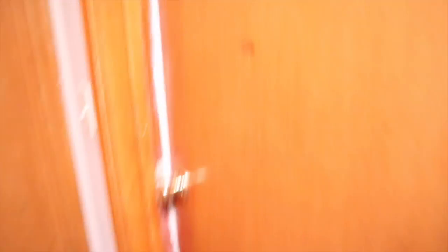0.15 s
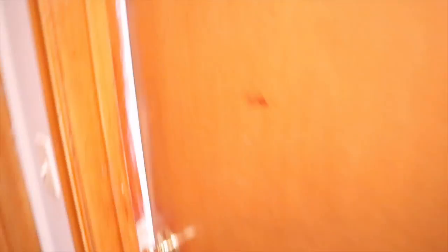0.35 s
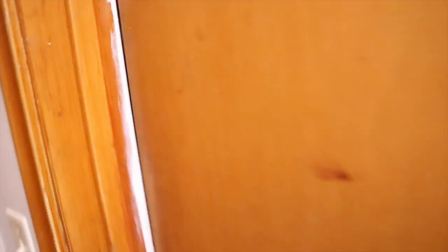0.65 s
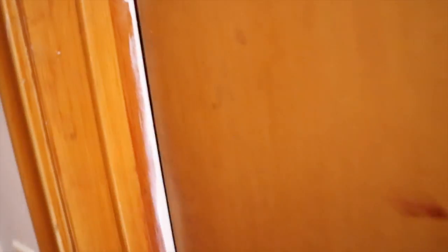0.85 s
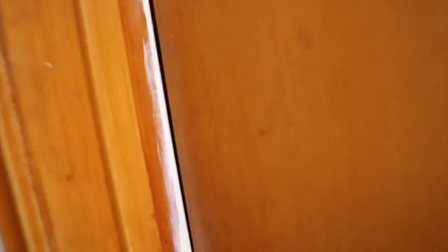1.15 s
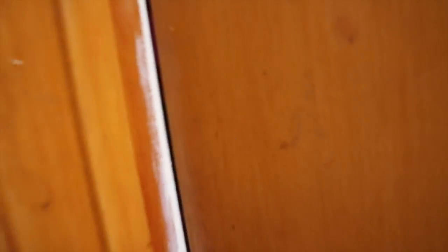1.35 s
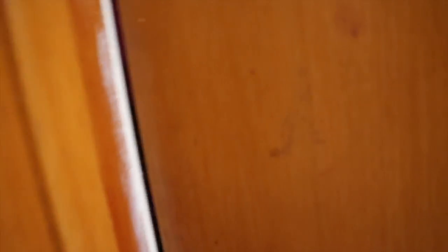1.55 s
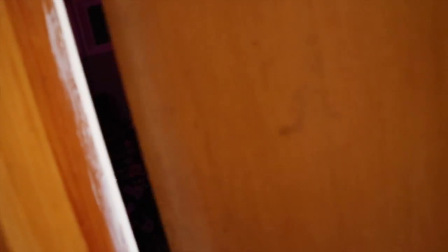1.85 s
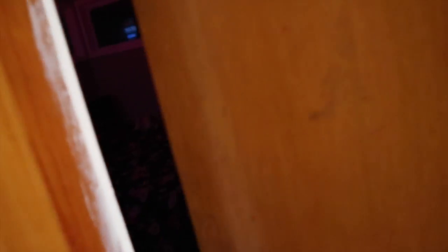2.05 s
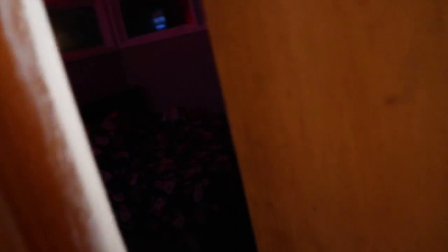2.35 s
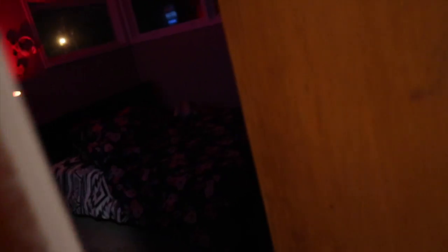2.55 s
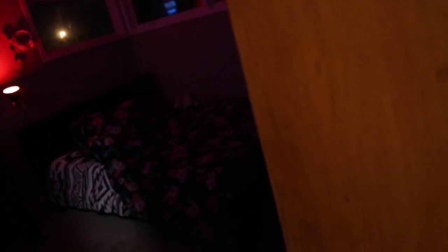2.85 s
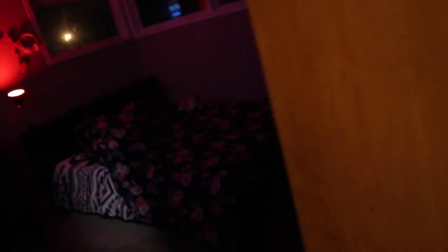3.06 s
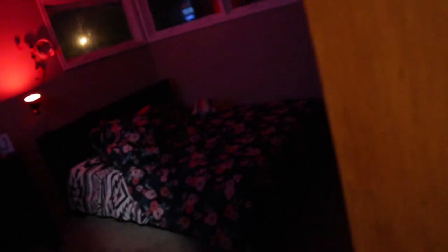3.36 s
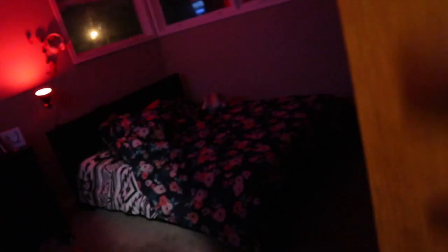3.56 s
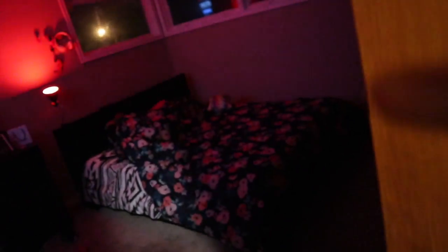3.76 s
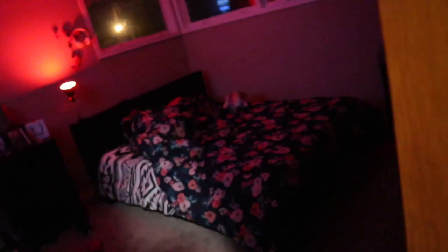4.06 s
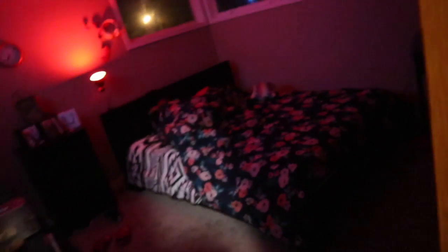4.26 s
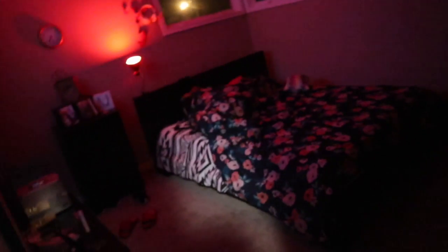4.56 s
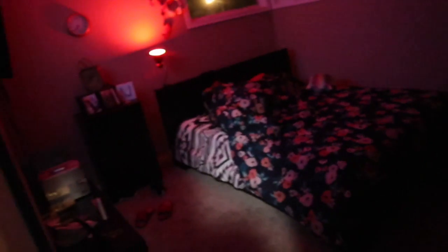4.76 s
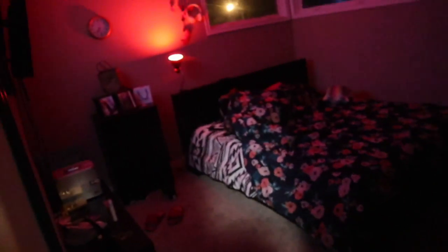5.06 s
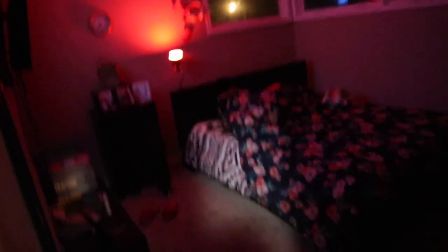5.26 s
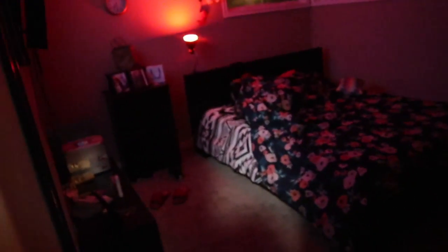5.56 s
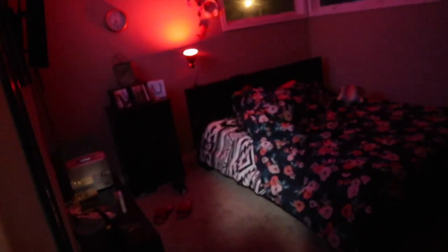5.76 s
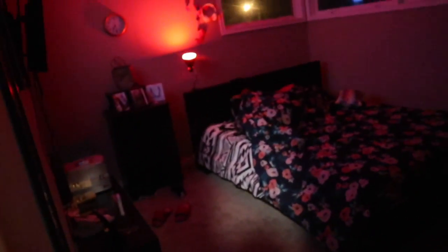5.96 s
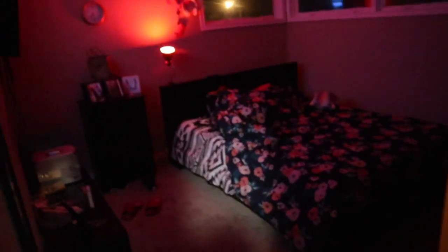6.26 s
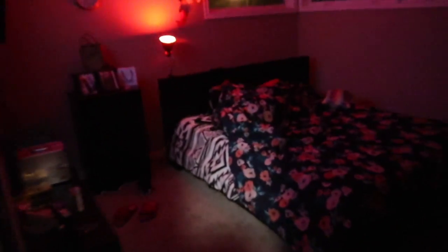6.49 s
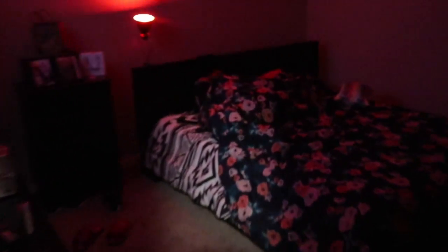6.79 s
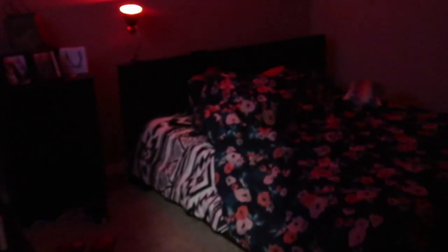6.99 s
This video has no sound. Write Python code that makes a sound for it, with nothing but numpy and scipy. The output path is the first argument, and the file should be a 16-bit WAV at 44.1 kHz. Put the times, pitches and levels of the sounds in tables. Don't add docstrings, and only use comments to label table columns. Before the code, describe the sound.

A low, wavering appliance hum fills a quiet house. Plastic creaks and soft finger rubs come first, then a door latch releases in a hard, rapid wooden-metallic rattle with a short hallway tail. After small knocks, close creaking, ticking and scuffing crowd the small handheld stereo microphones, leaning left, with one very sharp snap, a low bump and a brief skin squeak.

```python
import sys
import numpy as np
from scipy import signal
from scipy.fft import rfft, irfft, next_fast_len
from scipy.io import wavfile
from scipy.ndimage import uniform_filter1d

SR = 44100
rng = np.random.default_rng(int(sys.argv[2]) if len(sys.argv) > 2 else 0)


def to_wav(sig):
    pcm = np.clip(np.atleast_2d(sig), -1, 1) * 32767
    pcm = np.round(pcm).astype(np.int16)
    wavfile.write(sys.argv[1], SR, pcm.T)


def nominal_scale(level):
    x = np.asarray(level, float) / 20
    return 10 ** x


N = 314344

# frequency in Hz, level in dB per Hz.
PANEL_COLOUR = [(60, -26), (120, -10), (280, 1), (400, -4), (520, -6.5), (700, -7.5), (950, 7),
                (1330, -3.5), (1600, -4), (2200, -9.5), (3100, -16.5), (3700, -30.5), (6800, -34),
                (11000, -80)]
# start in seconds, peak in dB.
PRESS_EVENTS = [
    (5.307, -32),
    (5.466, -34),
    (5.489, -27.5),
    (5.51, -27.5),
    (5.531, -25.5),
    (5.5532, -27),
]


def read(points, hz):
    f, value = np.transpose(points)
    return np.interp(np.log(hz + 1), np.log(f + 1), value)


def evened(x):
    return x / np.sqrt(np.mean(x ** 2) + 1e-20)


def add(mix, s, sound):
    part = mix[round(s * SR):][:len(sound)]
    part += sound[:len(part)]


def coloured(points, count=N):
    size = next_fast_len(count)
    spectrum = rfft(rng.standard_normal(size))
    gain = nominal_scale(read(points, np.fft.rfftfreq(size, 1 / SR)))
    return evened(irfft(spectrum * gain, size)[:count])


def patchy(x, patchy_db):
    z = signal.stft(x, SR, nperseg=256, noverlap=192)[2]
    patches = uniform_filter1d(rng.standard_normal(z.shape), 5, 0)
    patches = evened(uniform_filter1d(patches, 24, 1))
    return evened(signal.istft(z * nominal_scale(patchy_db * patches), SR, nperseg=256, noverlap=192)[1][:N])


def ring(modes, count=1500, rise=0.00036):
    t = np.arange(count) / SR
    tones = sum(nominal_scale(db - 60 * t / t60) * np.sin(2 * np.pi * hz * t) for hz, db, t60 in modes)
    return tones * (1 - np.exp(-t / rise))


def ports(x, leaning, table, turn, corner_hz):
    size = next_fast_len(N)
    hz = np.fft.rfftfreq(size, 1 / SR)
    phase = np.exp(1j * turn / (1 + (hz / corner_hz) ** 4))
    side = irfft(rfft(leaning, size) * nominal_scale(read(table, hz)) * phase, size)[:N]
    return np.array([x + side, x - side])


def air():
    # frequency in Hz, level in dB per Hz.
    air_common = [(39, -13), (66, -3), (120, -9), (173, -8), (194, -3.5), (301, -7), (330, -5.5),
                  (405, -6.5), (510, -11), (613, -15.5), (1060, -20.5), (1280, -24), (2730, -30.5),
                  (10800, -47.5), (16000, -67.5)]
    air_differing = [(15, -42), (25, -35), (157, -2.5), (427, 0.5), (560, 0.5), (818, -1), (1040, -2),
                     (1370, -2), (7710, -16), (13500, -28.5), (16000, -48)]
    # time in seconds, nearness to the hallway air in dB.
    carried = [
        (0, 3.5),
        (.8, 0.5),
        (1.6, 2),
        (2.4, -0.5),
        (3.4, -0.5),
        (4.9, -3.5),
        (6.4, 0.5),
        (7.13, -1.5),
    ]
    # frequency in Hz, level in dB, width in Hz.
    hum_lines = [(43.2, -71, 5.9), (50.7, -50, 0.61), (62, -53, 1.4), (111, -59.5, 0.68),
                 (203.9, -54.5, 2.1), (236.8, -54.5, 5.5), (299.2, -54, 1.5), (353.5, -57.5, 6.2),
                 (388, -70, 12)]
    # frequency in Hz, differing over common part in dB.
    air_port = [(40, -38), (100, -24), (300, -18.5), (1000, -16), (4000, -19)]
    bass_follows, treble_follows = 0.7, 1.2
    t, both = np.arange(N) / SR, []
    for table, db in ((air_common, -43.5), (air_differing, -53)):
        hz, s, z = signal.stft(coloured(table), SR, nperseg=1024, noverlap=768)
        patches = uniform_filter1d(rng.standard_normal(z.shape), 10, 0)
        patches = evened(uniform_filter1d(patches, 16, 1))
        near_db = np.interp(s, *np.transpose(carried))
        share = np.clip(np.log2(hz / 500 + .01), 0, 1)[:, None]
        drift_db = ((1 - share) * bass_follows + share * treble_follows) * near_db
        moved = signal.istft(z * nominal_scale(drift_db + 1.1 * patches), SR, nperseg=1024, noverlap=768)[1]
        both.append(nominal_scale(db) * moved[:N])
    for hz, db, width in hum_lines:
        waver = rng.standard_normal((N // 1000 + 2, 2)) @ [1, 1j]
        waver = signal.lfilter([1], [1, -np.exp(-np.pi * width * 1000 / SR)], waver)
        waver = np.interp(t, np.arange(len(waver)) * 1000 / SR, waver)
        both[0] = both[0] + nominal_scale(db) * evened((waver * np.exp(2j * np.pi * hz * t)).real)
    common, differing = both
    return ports(common, common, air_port, turn=-1.6, corner_hz=3000) + np.array([differing, -differing])


def presses():
    # frequency in Hz, differing over common part in dB.
    press_port = [(60, -8), (200, -3), (500, -3), (1500, -6)]
    out = np.zeros(N)
    for s, db in PRESS_EVENTS:
        add(out, s, -nominal_scale(db + 3) * ring([(180, 0, 0.03)], count=3000, rise=0.00039))
    return ports(out, out, press_port, turn=-.5, corner_hz=1900)


def creaks():
    # start in seconds, peak in dB.
    slips = [(0.017, -38.5), (.0740, -27), (0.085, -31), (0.099, -27.5), (0.1097, -29), (0.1468, -26.5),
             (0.191, -25.5), (3.4974, -25.5), (3.5055, -28.5), (3.9783, -20.5), (3.99, -26), (4.1416, -20),
             (4.1496, -23), (4.16, -24.5), (4.1773, -21), (4.185, -22.5), (4.1915, -23.5), (4.1980, -24),
             (4.207, -23), (4.2172, -25.5), (4.2277, -26), (4.236, -26)]
    # frequency in Hz, level in dB, t60 in seconds.
    shell_body = [(323, -4, 0.01), (613, -7, 0.015), (767, -3.5, 0.025), (992, 3.5, 0.013),
                  (1277, 0, 0.0079), (1480, -7, .009), (1720, -7.5, 0.012), (2250, -16, 0.025),
                  (2470, -14, 0.013)]
    shell_treble = [(251, -5, 0.027), (390, 2, 0.0045), (4070, -9, 0.0086), (4430, -8, 0.009),
                    (5770, -8.5, 0.0066), (6480, -3.5, 0.0051), (7950, -23, 0.002)]
    shell_tip = [(6300, -24, 0.0068)]
    # frequency in Hz, differing over common part in dB.
    shell_port = [(300, -16), (900, -7), (2000, -3.5), (4500, -17), (7000, 4), (12000, 6.5)]
    long_stick_s, long_stick_db, short_stick_db = 0.01, 0, 1
    tip_grows = 1.8
    out, t = np.zeros(N), np.arange(700) / SR
    chance = rng.standard_normal((len(slips), 700))
    stuck = np.clip(np.diff(np.array(slips)[:, 0], prepend=-1) / long_stick_s, 0, 1)
    snap_db = short_stick_db + (long_stick_db - short_stick_db) * stuck
    for (s, db), treble_db, luck in zip(slips, snap_db, chance):
        body = [(hz * (1 + 0.03 * a), level + 1.4 * b, t60)
                for (hz, level, t60), a, b in zip(shell_body, luck, luck[20:])]
        treble = np.multiply(shell_treble, [1 + 0.013 * luck[40], 1, 1])
        grit = signal.lfilter([.5], [1, -.8], luck)
        add(out, s + 0.001213, nominal_scale(db + 1.0) * ring(body, rise=0.0004))
        add(out, s, -nominal_scale(db + treble_db + 1.5) * ring(treble, rise=0.00022))
        add(out, s, -nominal_scale(-20 + tip_grows * (db + 22.5)) * ring(shell_tip, count=300, rise=0.0001))
        add(out, s, nominal_scale(db - 26.5 - 60 * t / 0.054) * grit)
    return ports(out, out, shell_port, turn=2.0, corner_hz=1740)


def ticks():
    # start in seconds, peak in dB, frequency in Hz, length in cycles, crack in dB.
    tick_events = [(.383, -44, 2000, 0.38, -9), (0.41, -28.5, 1750, 0.31, -19),
                   (4.3706, -17, 2500, 0.36, -1.5), (4.3930, -20, 2630, 0.8, -4.5),
                   (4.3934, -19, 4530, 1.3, -17), (4.845, -23, 2740, 0.92, -16.5),
                   (4.8496, -22.5, 1980, 0.14, -18), (5.2029, -7.5, 1980, 0.42, -16.5),
                   (5.2027, -23.5, 8100, 1.2, -12), (5.5655, -33.5, 3960, 0.48, -12),
                   (6.287, -34.5, 1760, 0.8, -13), (6.2985, -26, 1750, 0.3, -14),
                   (6.3202, -33.5, 2150, 0.81, -12), (6.353, -27, 1710, 0.44, -19),
                   (6.4153, -30, 2060, 0.73, -4), (6.4678, -28, 1900, 0.45, -11.5),
                   (6.9911, -30, 2100, 0.36, -20), (7.03, -33, 2150, 0.47, -12),
                   (7.1214, -35.5, 2100, 0.96, -14), (5.3162, -30, 2000, 0.99, -11),
                   (5.2028, -26, 4180, 0.65, -24), (5.2027, -36, 14500, 1.5, -20),
                   (4.3934, -40, 14500, 1.5, -20), (3.4985, -32, 2200, .8, -14)]
    # delay in seconds, level in dB, frequency in Hz, cycles, crack in dB.
    press_tick = (.0004, -5, 1800, .5, -10)
    # frequency in Hz, level in dB, t60 in seconds.
    tick_ring = [(440, -20, 0.0081), (754, -12.5, 0.0054), (1000, -16, 0.012), (2100, -18, 0.017),
                 (2790, -25, 0.02)]
    # frequency in Hz, differing over common part in dB.
    tick_port = [(300, 4.5), (700, 1), (2000, -3), (3000, 1), (5000, 9), (8000, 6), (12000, 6)]
    lean_db = 2
    out, leaning, t = np.zeros(N), np.zeros(N), np.arange(600) / SR
    late_s, less_db, *shape = press_tick
    rows = tick_events + [(s + late_s, db + less_db, *shape) for s, db in PRESS_EVENTS]
    chance = rng.standard_normal((len(rows), 600))
    for (s, db, hz, cycles, crack_db), grit in zip(rows, chance):
        late = t - .0006
        snap = -nominal_scale(-1.5) * np.cos(2 * np.pi * late * hz) * np.exp(-(late * hz / cycles) ** 2 / 2)
        crack = nominal_scale(crack_db - 60 * np.maximum(late + 0.0005, 0) / 0.0046) * (late > -.0003)
        crack = crack * np.convolve(grit, [.33, .85, .33], "same")
        after = np.roll(ring(tick_ring, count=600, rise=0.00034), 30)
        tick = nominal_scale(db) * (snap + crack + after)
        add(out, s, tick)
        add(leaning, s, nominal_scale(lean_db) * tick)
    return ports(out, leaning, tick_port, turn=-1.45, corner_hz=1700)


def squeak(hz, width_hz):
    turn = np.exp(2j * np.pi * np.cumsum(hz) / SR)
    r = np.exp(-np.pi * width_hz / SR)
    return evened((turn * signal.lfilter([1 - r], [1, -r], rng.standard_normal(N) / turn)).real)


def fingers():
    # start, fastest and end in seconds, level in dB, treble in dB.
    slides = [(0.143, 0.545, 0.75, -52, -11.5), (.65, 1.004, 1.44, -56.5, -12.5),
              (3.777, 4.126, 4.44, -55.5, -15), (4.164, 4.373, 4.36, -54, -2),
              (4.333, 4.377, 4.58, -49, -6.5), (4.445, 4.56, 4.86, -49.5, -4), (4.7, 4.787, 4.76, -62, -11),
              (4.842, 4.844, 4.94, -46.5, -11), (4.881, 5.038, 5.14, -46, 3.5),
              (5.05, 5.165, 5.28, -49, -19), (5.19, 5.296, 5.46, -53, -8), (5.339, 5.37, 5.45, -44.5, -9.5),
              (5.42, 5.517, 5.76, -52.5, -10), (6.05, 6.086, 6.17, -47, -7),
              (6.168, 6.226, 6.26, -50, -7.5), (6.26, 6.32, 10, -64.5, -9)]
    # start in seconds, peak in dB, length in seconds, treble in dB.
    scuffs = [(0.457, -40, 0.008, -16), (0.518, -31, 0.0055, -23), (0.596, -43, 0.008, -10),
              (0.705, -38, 0.015, -17), (0.725, -40.5, 0.012, -13), (0.82, -36, 0.012, -17),
              (2.296, -45.5, 0.043, -4), (3.521, -38.5, 0.016, -17), (3.566, -37, 0.011, -11),
              (3.6282, -35.5, 0.009, -14), (3.7215, -39, 0.003, -9), (3.7285, -33, 0.003, -11),
              (3.863, -44, 0.008, -8), (5.471, -42, 0.003, -6), (6.319, -36, 0.004, -16),
              (6.99, -40, 0.004, -16), (4.393, -28, 0.015, -6), (4.502, -35.5, 0.016, -17),
              (4.709, -36.5, 0.022, -11), (5.175, -36, .004, -14), (5.309, -32.5, 0.0045, -10),
              (5.317, -33, .004, -8), (5.336, -37, .005, -6), (5.461, -44, 0.0072, 1),
              (6.01, -43.5, 0.0045, -4), (6.2925, -33, 0.0052, -15), (6.412, -35, 0.01, -9.5),
              (6.627, -43.5, 0.0074, -5)]
    # delay in seconds, level in dB, length in seconds, treble in dB.
    press_scuffs = [
        (.0002, -6, 0.0022, -9),
        (.004, -7, 0.0022, -6.5),
    ]
    # start, strongest and end in seconds, level in dB, pitch in Hz.
    squeaks = [
        (3.895, 4.09, 4.8, -60.5, 2190),
        (4.304, 4.55, 4.95, -53.5, 2160),
        (4.843, 4.886, 4.95, -56.5, 2880),
        (4.909, 5.033, 4.94, -48.5, 2250),
        (5.347, 5.378, 5.45, -62, 4101),
        (6.173, 6.233, 6.19, -42.5, 2130),
        (6.265, 6.353, 7.1, -60.5, 2100),
    ]
    # start, strongest and end in seconds, level in dB.
    brushes = [
        (.3, .55, 1.5, -77),
        (3.84, 3.897, 4.2, -70),
        (4.68, 4.72, 4.76, -63),
        (5.09, 5.107, 5.2, -66),
        (5.3, 5.33, 5.1, -67),
        (5.44, 5.498, 5.1, -64),
        (6.04, 6.08, 6.4, -67),
        (6.17, 6.21, 5.9, -57),
    ]
    # frequency in Hz, level in dB.
    skin_dull = [(400, 6.5), (1000, 8.5), (1700, 3.5), (2300, 6.5), (3200, 3.5), (4500, -1), (6500, -12),
                 (8000, -32), (12000, -23.5)]
    skin_bright = [(3000, -5), (5000, 9), (6000, 9.5), (6900, 6), (7500, -6), (8200, 6), (9000, 5.5),
                   (10000, 5), (10800, -9), (15000, -24)]
    skin_wide = [(3000, -14), (5000, 8), (6000, 10), (8000, 6), (10000, 7), (12500, 2), (13800, -14),
                 (16000, -30)]
    skin_sheen = [(6000, -27), (9500, -5), (11500, 6), (13000, -7), (16000, -16)]
    # frequency in Hz, differing over common part in dB.
    left_port = [(300, -38), (700, -17), (2000, -8), (3000, -2), (5000, -4), (8000, -16), (10000, 3),
                 (12000, 8.5)]
    stroke_bend, bright_bend, squeak_bend = 0.93, 1.54, 0.97
    t, dull, bright, whistle = np.arange(N) / SR, np.zeros(N), np.zeros(N), np.zeros(N)
    for *times, db, treble_db in slides:
        speed = np.interp(t, times, [0, 1, 0])
        dull += nominal_scale(db) * speed ** stroke_bend
        bright += nominal_scale(db + treble_db) * speed ** bright_bend
    for *times, db, hz in squeaks:
        whistle += nominal_scale(db) * np.interp(t, times, [0, 1, 0]) ** squeak_bend
    pressed = [(s + late, db + less_db, *rest)
               for s, db in PRESS_EVENTS for late, less_db, *rest in press_scuffs]
    for s, db, length, treble_db in scuffs + pressed:
        u = np.arange(0, 3, 1 / (SR * max(length, .002)))
        stroke = nominal_scale(db - 11.0) * np.minimum(u / 0.19, 1) * np.exp(-u ** 2 * 0.73)
        add(dull, s, stroke)
        add(bright, s, nominal_scale(treble_db) * stroke)
    brushing = sum(nominal_scale(db) * np.interp(t, times, [0, 1, 0]) for *times, db in brushes)
    sheen = brushing * patchy(coloured(skin_sheen), 2.)
    grain = nominal_scale(evened(uniform_filter1d(rng.standard_normal(N), 90)))
    rows = np.array(squeaks)
    latest = np.maximum(np.searchsorted(rows[:, 0], t) - 1, 0)
    squeak_hz = rows[latest, 4]
    rub = dull * patchy(coloured(skin_dull), 2.4) + bright * patchy(coloured(skin_bright), 1.7)
    rub = grain * (rub + whistle * squeak(squeak_hz, width_hz=250) + sheen)
    loose = dull * coloured(skin_dull) + nominal_scale(6.0) * bright * patchy(coloured(skin_wide), 3.)
    loose = grain * (loose + nominal_scale(3.0) * whistle * squeak(squeak_hz, width_hz=350))
    return ports(rub, rub, left_port, turn=-1.4, corner_hz=1900) + np.array([loose, -loose])


def hallway(count=22050, onset=0.00093):
    # frequency in Hz, t60 in seconds.
    hall_decay = [(100, 0.33), (500, 0.24), (1000, 0.31), (3000, 0.26), (8000, 0.19)]
    hz, t, z = signal.stft(coloured(PANEL_COLOUR, count), SR, nperseg=256)
    tail = signal.istft(z * nominal_scale(-60 * t / read(hall_decay, hz)[:, None]), SR, nperseg=256)[1]
    tail = tail * (1 - np.exp(-np.arange(len(tail)) / SR / onset))
    return tail / np.linalg.norm(tail)


def door():
    # start in seconds, blow in dB.
    latch = [
        (1.6211, -12.5),
        (1.6231, -10),
        (1.6258, -11),
        (1.6279, -11),
        (1.6310, -8.5),
        (1.636, -19),
        (1.641, -24),
        (1.652, -21),
        (1.665, -22),
        (1.696, -30),
    ]
    # frequency in Hz, level in dB, t60 in seconds.
    panel = [(100, -7, 0.23), (175.3, 5.5, 0.33), (280.6, -4.5, 0.14), (521.3, 6, 0.15), (822, 3, 0.2),
             (850, 4, 0.14), (921, 12, 0.17), (950, 5, 0.24), (1019, 5, 0.22), (1214, 0, 0.22),
             (1310, 0.5, 0.11), (1330, 2, 0.17), (1550, -4, 0.2), (1730, 3.5, 0.14)]
    # start in seconds, peak in dB, ring in Hz, t60 in seconds, hallway in dB.
    knocks = [(0.018, -25.5, 760, 0.02, -22), (0.268, -46, 980, 0.032, -10), (0.302, -40, 606, 0.043, 7),
              (0.702, -40.5, 604, 0.03, 12), (2.319, -22.5, 735, 0.012, -8), (2.798, -32.5, 674, 0.025, 2),
              (4.3719, -22, 600, 0.014, -6), (4.852, -30, 950, 0.03, -5), (5.178, -34, 674, 0.026, 5),
              (5.315, -33, 1070, 0.03, -18), (5.565, -42, 1030, 0.058, -11), (6.2, -42, 1000, 0.03, 0),
              (6.222, -41, 1050, 0.04, 0), (6.99, -38, 800, .02, -10)]
    # start in seconds, peak in dB, pitch in
    # Hz, t60 in seconds.
    thumps = [(0.031, -36, 159, 0.14), (1.469, -18, 156, 0.043), (1.519, -25.5, 188, 0.092),
              (1.62, -23.5, 100, 0.13), (1.626, -22, 284, 0.1), (1.624, -19.5, 520, 0.12),
              (1.621, -14, 1310, .06), (1.634, -28, 44.3, 0.29), (1.65, -29.5, 129, 0.28),
              (2.339, -20, 68, 0.059), (6.0709, -12, 105, 0.042), (6.0807, -16, 147, 0.055)]
    # frequency in Hz, differing over common part in dB.
    door_port = [(40, -30), (150, -21), (500, -16), (1300, -13), (4000, -10)]
    blows, out = np.zeros(N), np.zeros(N)
    t = np.arange(3000) / SR
    for k, (s, db) in enumerate(latch):
        add(blows, s, nominal_scale(db) * (-1) ** k * np.hanning(9) / 4)
        plate = coloured(PANEL_COLOUR, count=3000) * (1 - np.exp(-t / .0006))
        add(out, s, plate * nominal_scale(db - 2.5 - 60 * t / 0.024))
    bolt = ring([(850, 3, 0.025), (1110, 2, 0.02), (1310, 5, 0.022), (2200, -9, 0.015), (330, -8, .05),
                 (1700, 0.0, 0.019), (2860, -11, 0.022), (465, -6, 0.068)], count=3000, rise=0.00073)
    out += signal.oaconvolve(blows, nominal_scale(-8) * bolt)[:N]
    add(out, latch[0][0], nominal_scale(-26) * ring(panel, count=20000, rise=0.006))
    for s, db, hz, t60, wet_db in knocks:
        wood = [(hz, 0, t60), (1.28 * hz, -4, 0.94 * t60), (2.0 * hz, -6, 0.8 * t60),
                (0.565 * hz, -6, t60), (2.9 * hz, -14, 0.19 * t60)]
        add(out, s, -nominal_scale(db) * ring(wood, count=4000, rise=0.00024))
        add(blows, s, nominal_scale([db + wet_db]))
    lean = nominal_scale(-23.5) * np.roll(out, 40)
    for s, db, hz, t60 in thumps:
        add(out, s, nominal_scale(db) * ring([(hz, 0, t60), (1.6 * hz, -9, t60)], count=12000, rise=.003))
    hall_mid, hall_side = (signal.oaconvolve(blows, hallway())[:N] for _ in range(2))
    mid = out + nominal_scale(10.5) * hall_mid
    side = nominal_scale(-12) * hall_side + lean
    return ports(mid, mid, door_port, turn=-1.7, corner_hz=3000) + np.array([side, -side])


def scene():
    return air() + presses() + creaks() + ticks() + fingers() + door()


def top_cut(x):
    return signal.sosfilt(signal.butter(12, 16570, fs=SR, output="sos"), x)


def record(dry):
    rolloff = signal.butter(2, 15000, fs=SR, output="sos")
    dulled = signal.sosfilt(rolloff, dry)
    return top_cut(dulled)


dry = scene()
out = record(dry)
to_wav(out)
```